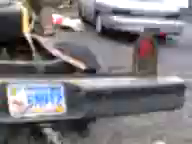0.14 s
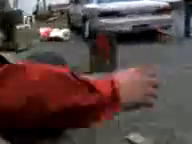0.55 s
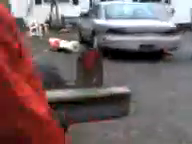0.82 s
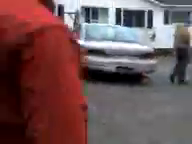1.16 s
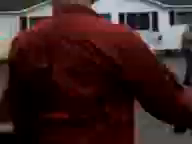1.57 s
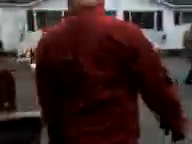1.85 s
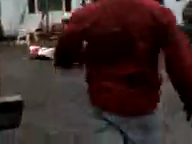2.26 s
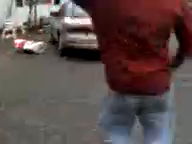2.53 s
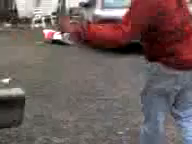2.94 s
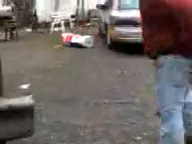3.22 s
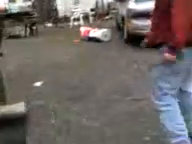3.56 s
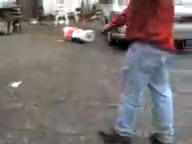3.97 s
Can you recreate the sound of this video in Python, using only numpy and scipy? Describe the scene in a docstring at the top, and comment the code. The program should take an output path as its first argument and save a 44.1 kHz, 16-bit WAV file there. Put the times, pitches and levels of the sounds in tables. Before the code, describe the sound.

A man walks over gravel, his steps faint beneath bumpy wind rumble and thin hiss. The whip slithers lightly over the ground, then swishes upward in pitch and snaps with one hard, clipped blast. A hollow plastic ring and faint steel ringing blend into a quickly fading echo; a little gravel scuffing remains. The close, narrow-band microphone sounds dull until the crack overloads it.

```python
"""Gravel yard: a man walks, then cracks a bullwhip a few metres from a small hand-held camera.
The lash is a noisy sine of rising pitch; the shock and its echoes are decaying noise clusters,
with ringing modes for truck and camera body. Boots are coloured grains and resonant stone clicks;
wind is short low-pitched puffs over rumble, with faint hiss behind. The microphone is narrow-band
and the crack overloads the recorder."""
import sys
import numpy as np
from scipy import signal
from scipy.fft import rfft, irfft
from scipy.io import wavfile

SR = 44100
rng = np.random.default_rng(int(sys.argv[2]) if len(sys.argv) > 2 else 0)


def bounce(signal):
    """Save signal as a 16-bit WAV file at the path given by the first command-line argument."""
    frames = np.transpose(np.atleast_2d(signal))
    limited = np.clip(frames, -1, 1)
    pcm = np.round(limited * 32767).astype(np.int16)
    wavfile.write(sys.argv[1], SR, pcm)


N = 180413
T = np.arange(N) / SR


def undb(db):
    """Decibels to gain."""
    return np.exp(np.asarray(db) * np.log(10) / 20)


def unit(x):
    """Scale to rms 1."""
    return x / np.sqrt(np.mean(x ** 2))


def colour(x, points, size=4096):
    """Minimum-phase filter through (Hz, dB) points that keeps the power of white noise."""
    hz, db = np.transpose(points)
    f = np.maximum(np.fft.rfftfreq(size, 1 / SR), 1)
    shape = undb(np.interp(np.log(f), np.log(hz), db))
    # steep fall past the last point
    gain = unit(shape / (1 + (f / hz[-1]) ** 8))
    # folding the cepstrum makes the filter causal
    cepstrum = irfft(np.log(gain))
    cepstrum[1:size // 2] *= 2
    cepstrum[size // 2 + 1:] = 0
    impulse = irfft(np.exp(rfft(cepstrum)))
    return signal.oaconvolve(x, impulse)[:N]


def resonate(x, hz, width_hz):
    """One resonance, gain 1 at its centre."""
    b, a = signal.iirpeak(hz, hz / width_hz, fs=SR)
    return signal.lfilter(b, a, x)


def grains(per_s, spread_db):
    """Random clicks of uneven size, rms 1."""
    sizes = undb(spread_db * np.minimum(rng.exponential(size=N), 4))
    hits = rng.random(N) < per_s / SR
    return unit(hits * sizes * rng.standard_normal(N))


def wander(per_s):
    """Smooth random curve with a spread near 1, from per_s random values a second."""
    curve = signal.resample_poly(rng.standard_normal(8192), 8, 1)
    return np.interp(T * per_s * 8, np.arange(len(curve)), curve)


def add(out, at_s, sound):
    """Mix a short sound in, starting at at_s."""
    start = int(round(at_s * SR))
    lo, hi = np.clip([start, start + len(sound)], 0, N)
    out[lo:hi] += sound[lo - start:hi - start]


def swells(rows):
    """Gaussian bumps of loudness, from rows (time [s], level [dB], half length [s])."""
    out = np.zeros(N)
    for at_s, db, half_s in rows:
        t = np.arange(-np.pi * half_s, np.pi * half_s, 1 / SR)
        add(out, at_s + t[0], undb(db) * np.exp(-(t / half_s) ** 2))
    return out


def ring(modes, at_s, build_s):
    """Decaying modes that build up while the blast passes."""
    out, age = np.zeros(N), T[:SR // 2]
    tones = np.zeros(len(age))
    for hz, db, t60_s in modes:
        tones += undb(db - 60 * age / t60_s) * np.sin(2 * np.pi * (hz * age + rng.random()))
    add(out, at_s, (1 - np.exp(-age / build_s)) * tones)
    return out


def yard(air_db=-62.5, drag_db=-59, drag_hz=3700):
    """Quiet outdoor hiss, and the lash slithering over the ground before the throw."""
    # hiss spectrum: (frequency [Hz], level [dB])
    air_spectrum = [(40, -6), (150, -12), (500, 1), (1000, -2), (2000, -4.5), (3300, -0.5), (4500, -12.5)]
    air = undb(air_db + 0.88 * wander(23)) * colour(grains(5500, 1.5), air_spectrum)
    rub = grains(4400, 4.7)
    high = resonate(resonate(rub, drag_hz, 420), drag_hz, 320)
    low = resonate(rub, 2630, 750)
    slither = unit(high + 0.65 * low)
    return air + swells([(2.08, drag_db, 0.16)]) * slither


def eddies(flow, over_db=3.5, scatter_db=3.0, count=130, centre_hz=212, spread_oct=0.53):
    """Small puffs at uneven intervals, scaled by the air flow: rows (time [s], level [dB], pitch [Hz])."""
    when, size, pitch = rng.uniform(-1, 1, (count, 3)).T
    at_s = (np.arange(count) + .5 + when / 2) * T[-1] / count
    db = 20 * np.log10(np.interp(at_s, T, flow)) + over_db + scatter_db * size
    return list(zip(at_s, db, centre_hz * 2 ** (spread_oct * pitch)))


def wind(puff_db=-1.5, breeze_db=-3, flutter_db=2, tear_db=-17, lull_db=2.5, wake_db=-6.5, wake_s=0.0068):
    """Each eddy hits the diaphragm abruptly, dies within a cycle or two and breaks into finer turbulence."""
    # light breeze: (time [s], level [dB])
    calm = [(0, -49), (1.2, -46), (1.9, -48), (2.4, -53.5), (2.95, -48.5), (3.4, -55.5), (3.6, -50),
            (3.83, -48.5), (4.05, -59.5)]
    # gusts over the moving microphone: (time [s], level [dB], half length [s])
    gusts = [(.03, -26.5, 0.079), (.22, -42.5, 0.12), (.46, -32.5, 0.03), (.56, -27.5, 0.04),
             (.73, -37, 0.038), (.85, -42.5, 0.027), (.94, -33, 0.049), (1.1, -32, 0.033), (1.56, -33, .04),
             (1.9, -39, 0.02), (2.12, -38, 0.054), (2.3, -36.5, 0.021), (2.45, -32.5, 0.026),
             (2.61, -29.5, 0.088), (2.83, -34.5, 0.098)]
    # hardest puffs: (time [s], level [dB], pitch [Hz])
    hard_puffs = [(0.022, -23, 338), (.035, -22, 554), (0.083, -9, 434), (.439, -27, 327),
                  (0.461, -17, 226), (.539, -18.5, 393), (.565, -13.5, 372), (0.573, -19.5, 470),
                  (0.584, -17, 266), (.707, -25.5, 217), (0.922, -21.5, 326), (.928, -21.5, 172),
                  (1.025, -20.5, 320), (1.063, -20, 325), (1.209, -26.5, 272), (1.382, -22, 213),
                  (1.583, -23, 353), (1.596, -23, 287), (1.636, -26, 313), (2.512, -24, 220),
                  (2.553, -19.5, 256.4), (2.568, -22.5, 365), (2.595, -20, 336), (2.659, -13.5, 286),
                  (2.842, -24.5, 247)]
    # rumble spectrum: (frequency [Hz], level [dB])
    buffet = [(25, -39.5), (60, -16), (130, 2.5), (200, 2.5), (310, -6.5), (450, -14), (700, -30.5),
              (1200, -46), (4000, -62.5)]
    # fine turbulence inside a puff: (frequency [Hz], level [dB])
    tear = [(100, -10.5), (300, 5), (550, -2), (900, -8.5), (1500, -30.5), (3500, -30)]
    rise_cycles, fall_cycles, sag_cycles = 0.29, 0.82, 0.21

    s, db = np.transpose(calm)
    breeze = undb(np.interp(T, s, db) + lull_db * wander(16))
    flow = np.hypot(breeze, swells(gusts))
    out, push = np.zeros(N), np.zeros(N)
    t = np.arange(-.015, .04, 1 / SR)
    puffs = hard_puffs + eddies(flow)
    for (at_s, level_db, hz), turn in zip(puffs, rng.random(len(puffs))):
        cycles = t * hz
        bump = 2 / (np.exp(-cycles / rise_cycles) + np.exp(cycles / fall_cycles))
        envelope = undb(level_db + puff_db) * bump
        # the pitch sinks as the eddy slows
        wave = np.sin(2 * np.pi * (cycles + sag_cycles * np.tanh(2 * cycles + 1) + turn))
        add(out, at_s + t[0], envelope * wave)
        add(push, at_s + t[0], envelope)
    # rumble trails each puff
    linger = np.exp(-1 / (wake_s * SR))
    wake = signal.lfilter([1 - linger], [1, -linger], push)
    strength = np.hypot(undb(breeze_db) * flow, undb(wake_db) * wake)
    flutter = unit(undb(flutter_db * wander(70)) * rng.standard_normal(N))
    rumble = colour(strength * flutter, buffet)
    return out + rumble + undb(tear_db) * colour(push * rng.standard_normal(N), tear)


def tread(at_s, db, grind_s, heel_s=.012, lift_s=.035):
    """Weight on one boot: the heel comes down, the sole grinds, the foot lifts."""
    early, late = np.maximum(at_s - T, 0), np.maximum(T - at_s - grind_s, 0)
    return undb(db) * np.exp(-early / heel_s - late / lift_s)


def footsteps(ring_s=0.042, stone_width_hz=1100, stone_db=0.5, grit_db=-1.5, crunch_db=2.5):
    """Each boot grinds many small stones; now and then a bigger one clicks."""
    # boots landing or scuffing: (time [s], level [dB], grind [s])
    steps = [(.02, -50, .03), (.6, -51.5, 0.051), (1.145, -51, .12), (1.664, -52, .14), (2.36, -45.5, .035),
             (2.633, -53, .02), (2.919, -52, .02), (3.481, -47, .04), (4.04, -54.5, .1)]
    # gravel spectrum: (frequency [Hz], level [dB])
    gravel = [(100, -38.5), (500, -2.5), (1100, -7), (1650, 4), (2200, -5), (2900, 0), (3450, -4.5),
              (4000, -9)]
    # loudest stones knocking: (time [s], level [dB], pitch [Hz])
    stones = [(0.021, -35.5, 1400), (0.3075, -46.5, 1620), (.537, -37.5, 1150), (1.149, -42.5, 2510),
              (1.203, -39.5, 1740), (1.275, -36, 1000), (1.662, -42.5, 3160), (1.781, -38.5, 1740),
              (2.5496, -36.5, 2640), (2.893, -40, 1070), (2.9272, -34, 1650), (3.5142, -34, 1732),
              (3.7151, -42, 1420)]
    # loose grit shifts around each step
    settle_db, settle_half_s = -9.5, 0.14
    settling = swells([(at_s + grind_s, db + settle_db, settle_half_s) for at_s, db, grind_s in steps])
    treads = sum(tread(*row) for row in steps)
    weight = np.hypot(treads, settling) * undb(grit_db + crunch_db * wander(90))
    out = colour(weight * grains(3000, 3.3), gravel)
    age = T[:SR // 20]
    for at_s, db, hz in stones:
        scrape = undb(-60 * age / ring_s) * rng.standard_normal(len(age))
        knock = resonate(resonate(scrape, hz, stone_width_hz), hz, stone_width_hz)
        add(out, at_s, undb(db + stone_db) * knock / np.abs(knock).max())
    return out


def truck(at_s=3.075, build_s=0.005, ring_db=-33.5, shimmer_db=3):
    """Steel panels beside the camera ring on faintly after the shock, their level shimmering at random."""
    # panel modes: (frequency [Hz], relative level [dB], t60 [s])
    steel = [(287.5, 2.5, 0.67), (432, -8, 0.41), (469, 3.5, 0.5), (1065, -6, 0.39), (1588, 1, 0.62),
             (1864, 11, 0.27), (2450, -13, 0.93), (2820, 2.5, 0.53), (2930, -7.5, 0.87), (3680, -1, 0.39)]
    return undb(ring_db + shimmer_db * wander(40)) * ring(steel, at_s, build_s)


def housing(at_s=3.064, build_s=.012, ring_db=9.5):
    """The plastic camera body gives a short, hollow ring under the blast."""
    # body modes: (frequency [Hz], relative level [dB], t60 [s])
    body = [(466, -24, .17), (928, -21, 0.11), (985, -23.5, .1), (1091, -22.5, .09), (1360, -24.5, 0.033),
            (1573, -9.5, 0.099), (1856, -22, .1), (2010, -21.5, .09), (2470, -23.5, 0.12),
            (2691, -20.5, .12), (2917, -16, 0.086), (3040, -22, 0.15), (3360, -15, .1)]
    return undb(ring_db) * ring(body, at_s, build_s)


def swish(waver=0.07, rough=0.6, rasp_db=-15, rasp_hz=3400):
    """Vortices shed by the lash whistle roughly, higher as it speeds up; the thin tip adds a rasp."""
    # air rushing past the lash: (time [s], mean pitch [Hz], level [dB])
    lash = [(2.985, 300.5, -54), (3.007, 400.1, -45), (3.021, 618, -40), (3.034, 970, -30.5),
            (3.04, 1075, -26.5), (3.056, 1097, -30), (3.066, 1197, -53)]
    # surges as the loop races down the thong: (time [s], level [dB], half length [s])
    surges = [(3.0381, -13.5, 0.00049), (3.0415, -3, 0.002), (3.0486, -8, 0.0021), (3.0552, -7, 0.00094)]
    s, hz, db = np.transpose(lash)
    pitch_hz = np.interp(T, s, hz) * (1 + waver * wander(400))
    phase = 2 * np.pi * np.cumsum(pitch_hz) / SR
    rush = undb(np.interp(T, s, db, left=-120, right=-120))
    surge, tone = swells(surges), np.sin(phase)
    rough_tone = wander(500) * tone + wander(500) * np.cos(phase)
    vortices = (1 - rough) * tone + 2 * rough * rough_tone
    rasp = unit(resonate(resonate(rng.standard_normal(N), rasp_hz, 1700), rasp_hz, 1700))
    return rush * vortices + surge * tone + undb(rasp_db) * (rush + surge) * rasp


def cluster(at_s, db, hold_s, t60_s):
    """Envelope of one bundle of reflections: sudden start, short plateau, decay."""
    return (T >= at_s) * undb(db - 60 * np.maximum(T - at_s - hold_s, 0) / t60_s)


def crack(near_db=-1.0, far_db=-1, patchy_db=1.5, near_count=2):
    """The tip's sonic boom comes by way of ground and truck first, then from the cars and the house."""
    # shock and echoes: (time [s], level [dB], hold [s], t60 [s])
    echoes = [(3.058, -8.5, 0.0028, 0.015), (3.064, -6, 0.023, 0.044), (3.089, -20.5, 0.034, 0.18),
              (3.165, -32.5, 0.017, 0.034), (3.197, -38.5, 0.018, 1), (3.283, -68, 0.0088, 0.14)]
    # spectrum of the nearby shock: (frequency [Hz], level [dB])
    near_spectrum = [(30, -17.5), (62, -6.5), (110, -15), (200, -10.5), (480, -5.5), (720, -5.5),
                     (1050, -1), (1500, 0.5), (2000, 1.5), (2700, -4.5), (3100, 1.5), (3550, -2),
                     (3900, -14), (4500, -9)]
    # spectrum of the far echoes: (frequency [Hz], level [dB])
    far_spectrum = [(40, -13), (150, 1), (300, 2), (480, -1.5), (750, -3.5), (1380, -4), (1590, 2.5),
                    (1760, -3), (2300, -4.5), (2800, 0.5), (3130, -4.5), (3450, 1.5), (3900, -7),
                    (4500, -10.5)]
    near = sum(cluster(*row) for row in echoes[:near_count]) * rng.standard_normal(N)
    far = sum(cluster(*row) for row in echoes[near_count:]) * grains(14000, 0.63)
    far_gain = undb(far_db + patchy_db * wander(110))
    return undb(near_db) * colour(near, near_spectrum) + far_gain * colour(far, far_spectrum)


def scene():
    """Everything that reaches the microphone."""
    whip = swish() + crack() + housing() + truck()
    return (whip + footsteps() + wind() + yard())[None]


def record(dry, mic_low_hz=44.7, mic_high_hz=3900, overload=0.76, knee=16, top_hz=15800):
    """A speech-band microphone whose signal then saturates, spraying treble during the crack."""
    narrow = signal.sosfilt(signal.butter(16, mic_high_hz, fs=SR, output="sos"), dry)
    narrow = signal.sosfilt(signal.butter(2, mic_low_hz, "high", fs=SR, output="sos"), narrow)
    clipped = narrow / (1 + np.abs(narrow / overload) ** knee) ** (1 / knee)
    return signal.sosfilt(signal.ellip(10, .2, 80, top_hz, fs=SR, output="sos"), clipped)


dry = scene()
out = record(dry)
bounce(out)
```